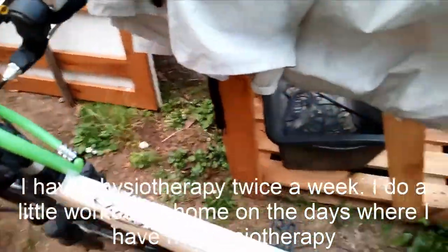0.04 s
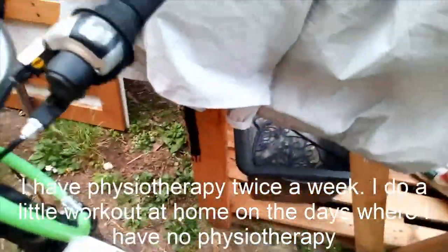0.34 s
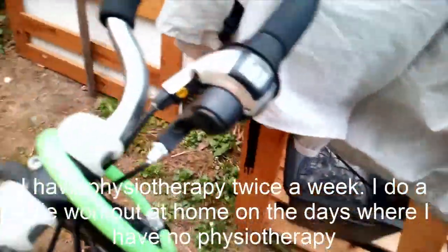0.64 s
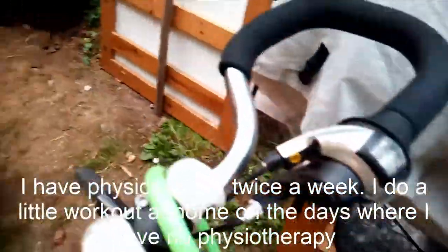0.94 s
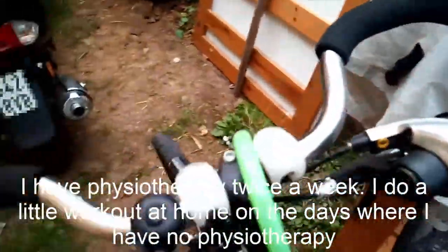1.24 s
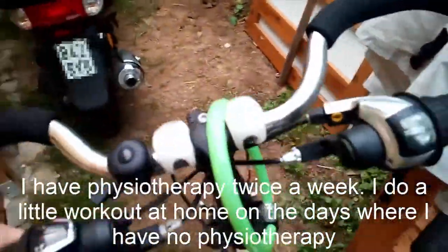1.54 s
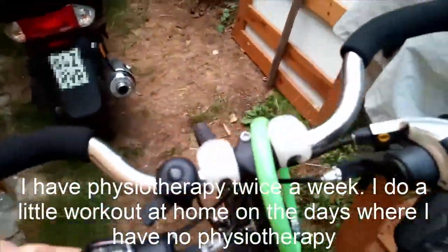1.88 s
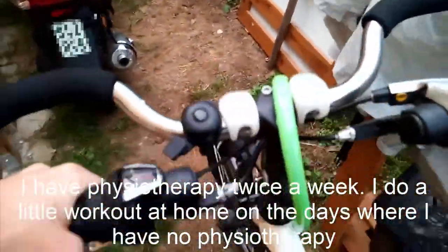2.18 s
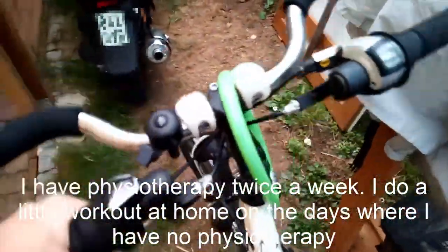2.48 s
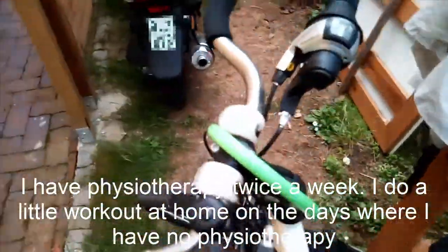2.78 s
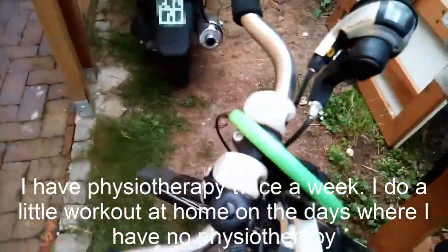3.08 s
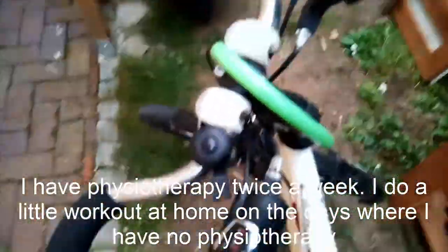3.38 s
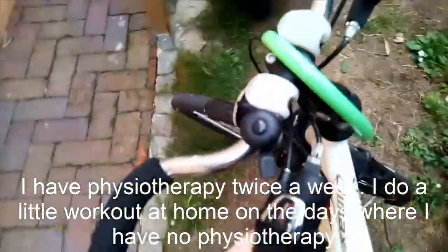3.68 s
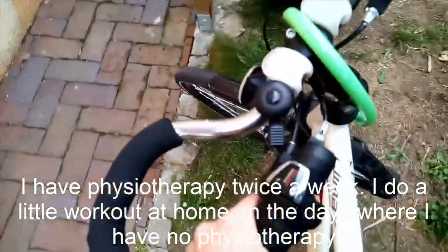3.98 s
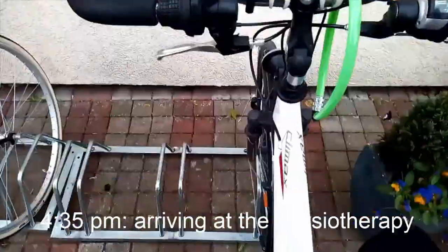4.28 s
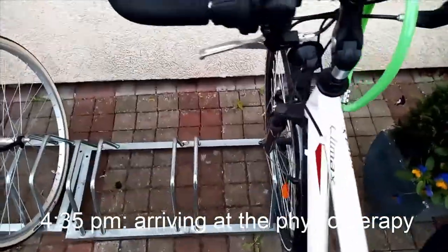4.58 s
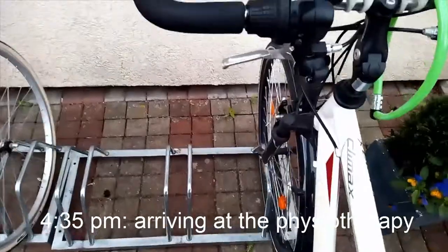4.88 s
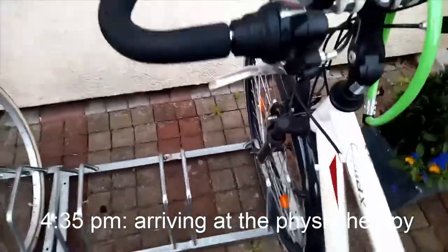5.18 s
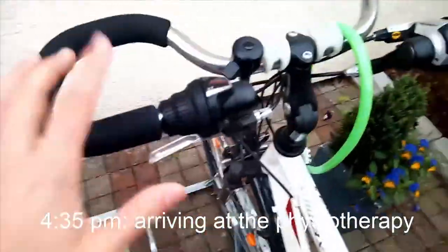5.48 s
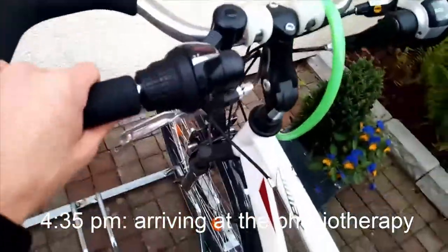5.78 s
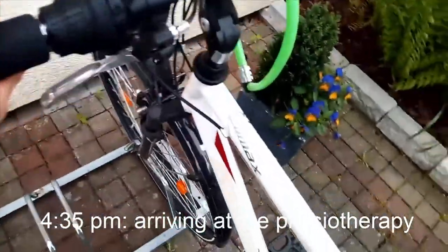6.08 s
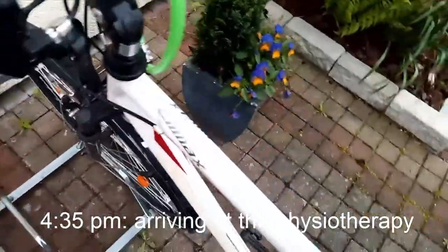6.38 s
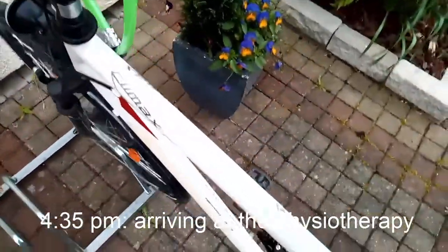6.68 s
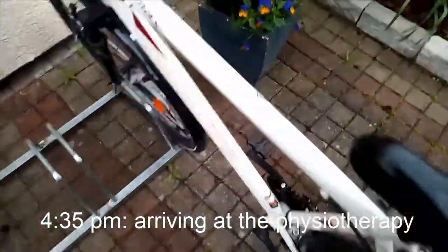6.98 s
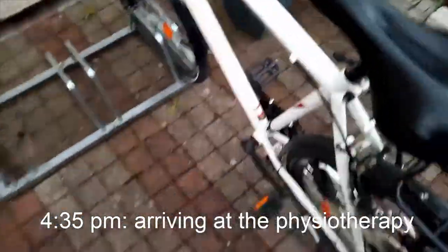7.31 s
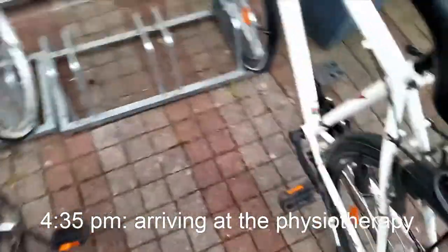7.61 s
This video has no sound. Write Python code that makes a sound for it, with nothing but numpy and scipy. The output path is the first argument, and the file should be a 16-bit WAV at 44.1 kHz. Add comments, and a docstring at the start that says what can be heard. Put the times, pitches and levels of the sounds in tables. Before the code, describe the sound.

A bicycle is wheeled by hand out of a yard, with soft nylon jacket rustle, scuffing soles and a distant motor hum. The freewheel ticks in short runs, then the handheld microphone's case knocks and creaks. After a brief dropout the bicycle is parked: levers clack, a sleeve swishes, the front wheel clashes against a metal rack and a brake squeals faintly. Loud close knocks and low bumps end it, leaving a faint steel ring.

```python
"""A nylon jacket rustles and soles scuff over a far motor's hum as a bicycle is wheeled out of a yard.
Freewheel pawls tick and ring the wheel, levers clack, and the microphone's case creaks and knocks in
the hand. After a short near-silence the bicycle is parked on paving: a sleeve zips over the jacket,
the front wheel jolts against the rack, a brake pad squeals on the rim and thin steel rings on."""
import sys
import numpy as np
from scipy import signal
from scipy.fft import rfft, irfft, next_fast_len
from scipy.io import wavfile
from scipy.ndimage import map_coordinates

SR = 44100
rng = np.random.default_rng(int(sys.argv[2]) if len(sys.argv) > 2 else 0)


def generate_wav(sig):
    """Save sig (samples, or channels by samples) to the path in sys.argv[1] as 16-bit PCM at SR."""
    pcm = np.round(np.clip(np.atleast_2d(sig).T, -1, 1) * 32767).astype(np.int16)
    wavfile.write(sys.argv[1], SR, pcm)


N = 341686
TIME = np.arange(N) / SR
YARD_END_S, RACK_START_S = 4.2, 4.25


def from_db(db):
    """Decibels to gain."""
    return 10 ** (np.asarray(db) / 20)


def unit_rms(x):
    """Scale to rms 1."""
    return x / np.sqrt(np.mean(x ** 2) + 1e-20)


def db_at(spectrum, hz):
    """Read a spectrum on a log-frequency axis."""
    points_hz, db = np.transpose(spectrum)
    return np.interp(np.log(hz + 1e-3), np.log(points_hz), db)


def noise(spectrum):
    """Coloured noise, rolled off beyond the table's ends; rms 1."""
    size = next_fast_len(N)
    hz = np.arange(size // 2 + 1) * SR / size
    skirts = np.minimum(hz / spectrum[0][0], 1) ** 2 / np.maximum(hz / spectrum[-1][0], 1) ** 2
    bins = rfft(rng.standard_normal(size)) * from_db(db_at(spectrum, hz)) * skirts
    return unit_rms(irfft(bins, size)[:N])


def drift(knots_per_s):
    """Random wander with a spread near 1."""
    knots = rng.standard_normal(N // 8)
    return np.interp(TIME * knots_per_s, np.arange(len(knots)), knots)


def add(track, start_s, sound):
    """Mix a sound into a track."""
    start = int(round(start_s * SR))
    track[start:start + len(sound)] += sound[:N - start]


def decay(t, t60_s):
    """Exponential decay from t = 0, down 60 dB at t60_s."""
    return (t >= 0) * from_db(-60 * np.maximum(t, 0) / t60_s)


def resonate(x, hz, width_hz):
    """One resonance, peak gain 1."""
    r = np.exp(-np.pi * width_hz / SR)
    feedback = [1, -2 * r * np.cos(2 * np.pi * hz / SR), r * r]
    return signal.lfilter(np.array([1, 0, -1]) * (1 - r * r) / 2, feedback, x + 1e-18)


def noise_band(samples, hz, width_hz):
    """Noise in one broad resonance; rms 1."""
    return unit_rms(resonate(resonate(rng.standard_normal(samples), hz, width_hz), hz, 2 * hz))


def metal_ring(x, modes):
    """Parallel modes of a metal part, alternating in sign."""
    return sum((-1) ** k * from_db(db) * resonate(x, hz, width_hz)
               for k, (hz, width_hz, db) in enumerate(modes))


# Reflections off ground and bicycle. Each row: delay in seconds, gain in dB.
ECHOES = [(.0025, -11.5), (.0063, -9)]
def echoed(x, sway=0.1796):
    """Short echoes whose delays sway as the hand moves; rms 1."""
    echoes = sum(from_db(db) * map_coordinates(x, [(TIME - delay_s * (1 + sway * drift(3))) * SR])
                 for delay_s, db in ECHOES)
    return unit_rms(x + echoes)


# Wheel and frame modes. Each row: frequency in Hz, width in Hz, gain in dB.
WHEEL_MODES = [(1530, 20, -5), (2455, 52, 2), (2705, 37, -6), (2917, 30, 1), (2993, 33, -3), (3100, 22, -6),
               (3394, 20, -3), (4850, 32, -2.5), (5160, 41, -15), (5550, 63, -11), (6240, 64, -0.5),
               (6700, 38, 3), (6900, 26, 2), (8050, 16, -7), (8470, 78, -6), (9060, 18, -10),
               (9500, 73, -5), (10400, 110, -1)]
def wheel_ring(x):
    """Spokes and frame ring when brushed or struck."""
    return metal_ring(x, WHEEL_MODES)


# Nylon friction spectrum. Each row: frequency in Hz, relative density in dB.
NYLON_SPECTRUM = [(700, -9), (1400, -5), (2500, 2), (3600, -1.5), (5000, -3), (6600, -1), (8000, -9),
                  (10000, -12), (12500, -22), (15200, -14), (16000, -57)]
# Rustle curve. Each row: time in seconds, level in dB.
RUSTLE = [(0, -53.5), (0.72, -49.5), (0.96, -53.5), (1.26, -52), (1.38, -50.5), (1.9, -61),
          (2.29, -57.5), (2.56, -49), (3.14, -60), (3.66, -55.5), (3.8, -59), (4.19, -52.5),
          (4.27, -53.5), (4.37, -51), (4.56, -48.5), (5.13, -44.5), (5.27, -50.5), (5.54, -46),
          (5.82, -53.5), (5.99, -38), (6.4, -43), (6.75, -41), (7.42, -52.5), (7.74, -49)]
def jacket_rustle(grain_db=2, swell_db=1, frame_db=-2):
    """Cloth rustles in fine grains and brushes the frame."""
    times_s, level_db = np.transpose(RUSTLE)
    cloth = noise(NYLON_SPECTRUM) * from_db(grain_db * drift(700) + swell_db * drift(18))
    frame = from_db(frame_db) * wheel_ring(noise(NYLON_SPECTRUM))
    return from_db(np.interp(TIME, times_s, level_db)) * echoed(cloth + frame)


# Ground contact spectra. Each row: frequency in Hz, relative density in dB.
SCUFF_SPECTRUM = [(120, -28), (300, -0.5), (480, 4.5), (1000, -0.5), (1600, -7), (3000, -11.5)]
RUMBLE_SPECTRUM = [(20, -9), (40, -12), (75, -1), (110, 3.5), (180, 0.5), (280, -4.5), (450, -10.5),
                   (900, -47)]
# Movement over the ground. Each row: time in seconds, relative scuff and rumble levels in dB.
GROUND = [(0, -58.5, -54), (1.73, -61.5, -52), (1.97, -71, -52), (2.3, -70, -55.5), (2.75, -61, -54.5),
          (3.33, -71.5, -53.5), (3.57, -56.5, -53), (4.03, -64.5, -49), (4.19, -59, -52),
          (4.27, -62, -59), (4.69, -53.5, -52.5), (4.94, -51, -52.5), (5.49, -57, -54.5),
          (5.89, -60, -54), (6.19, -50.5, -50), (6.73, -53, -56), (7.42, -56, -45), (7.74, -53.5, -50.5)]
def soles_and_tyres(grit_db=3, scuff_trim_db=1.5, early_db=-3, later_db=1, louder_from_s=3.3):
    """Soles and tyres scuff over a low rumble, softer for the first 3.3 s."""
    times_s, scuff_db, rumble_db = np.transpose(GROUND)
    grit = echoed(noise(SCUFF_SPECTRUM) * from_db(grit_db * drift(150)))
    scuff = from_db(np.interp(TIME, times_s, scuff_db) + scuff_trim_db) * grit
    step_db = np.where(TIME < louder_from_s, early_db, later_db)
    rumble = from_db(np.interp(TIME, times_s, rumble_db) + step_db) * noise(RUMBLE_SPECTRUM)
    return scuff + rumble


# Motor tones. Each row: frequency in Hz, rms level in dB.
MOTOR_TONES = [(87.5, -57.5), (110, -70), (163, -56.5), (174, -61.5), (264, -65), (328.4, -66)]
def motor_hum(wander=0.00623, waver_db=1):
    """A distant motor's wavering low tones, in the yard only."""
    out = np.zeros(N)
    for hz, db in MOTOR_TONES:
        amplitude = np.sqrt(2) * from_db(db + waver_db * drift(7.26))
        pitch_hz = hz * (1 + wander * drift(4.06))
        out += amplitude * np.sin(2 * np.pi * np.cumsum(pitch_hz) / SR)
    return out * (TIME < YARD_END_S)


# Hand on grip and sleeve. Each row: start in seconds, length in seconds, peak level in dB.
RUBS = [(0.086, 0.35, -50), (1.155, 0.046, -53), (2.484, 0.67, -53), (4.439, 0.15, -45.5)]
# Rub spectrum. Each row: frequency in Hz, relative density in dB.
RUB_SPECTRUM = [(1200, 0), (2300, 6.5), (4000, -3), (6500, 4.5), (9000, -7), (12500, -12), (15200, -8),
                (16000, -19)]
def hand_rubs(peak_share=0.19, grain_db=2):
    """Dry friction hiss swells quickly and ebbs as the hand slows."""
    pressure = np.zeros(N)
    for start_s, length_s, db in RUBS:
        pressure += from_db(db) * np.interp((TIME - start_s) / length_s, [0, peak_share, 1], [0, 1, 0])
    return pressure * echoed(noise(RUB_SPECTRUM) * from_db(grain_db * drift(700)))


# Tyre, sole and cable slides. Each row: start and length in seconds, relative level in dB, centre in Hz.
SLIDES = [(.322, 0.079, -54, 800), (.818, 0.056, -47.5, 990), (1.498, 0.028, -40.5, 1740),
          (3.373, 0.0092, -53, 1230), (4.898, 0.057, -38.5, 3300), (5.278, 0.049, -43, 3180),
          (5.573, 0.053, -46, 3070), (5.801, 0.15, -41.5, 4630), (6.019, 0.026, -41, 4250),
          (7.109, 0.12, -50.5, 5370), (7.151, 0.018, -39.5, 624)]
def slides(rise_s=0.0011, fade_s=0.12, grain_db=4.5, ring_db=7, direct_db=-3):
    """Friction sets in at once, holds, then dies; it excites the wheel's modes."""
    friction, t = np.zeros(N), TIME[:SR // 3]
    for start_s, length_s, db, hz in SLIDES:
        rise = 1 - np.exp(-t / rise_s)
        fall = decay(np.maximum(t - 0.98 * length_s, 0), fade_s + length_s)
        add(friction, start_s, from_db(db) * noise_band(len(t), hz, 1.1 * hz) * rise * fall)
    friction *= from_db(grain_db * drift(600))
    return from_db(direct_db) * friction + from_db(ring_db) * wheel_ring(friction)


# Spectrum of small ticks and case cracks. Each row: frequency in Hz, relative density in dB.
CRACK_SPECTRUM = [(500, 5), (1300, 2.5), (2400, -1), (3500, 0), (5000, -7), (6500, 0.5), (8500, -12),
                  (11500, -15), (15500, -15.5)]
def cable_and_grit_ticks(per_s=4, level_db=-48, spread_db=3, t60_s=0.0083):
    """Cables and grit tick faintly at random."""
    onsets = rng.random(N) < per_s / SR
    impulses = onsets * from_db(level_db + spread_db * rng.standard_normal(N))
    envelope = signal.lfilter([1], [1, -decay(1 / SR, t60_s)], impulses + 1e-18)
    return envelope * noise(CRACK_SPECTRUM)


# Case knocks. Each row: start in seconds, crack in dB, push in dB, push in Hz, thump in dB.
KNOCKS = [(0.6027, -27.5, -19, 456, -35), (3.460, -30, -32, 905, -32.5), (3.4672, -17, -13.5, 1700, -41),
          (3.5891, -18.5, -23.5, 1340, -47), (3.599, -28, -21, 1310, -25.5), (3.828, -18.5, -19, 1320, -24),
          (3.9608, -21, -22.5, 850, -31), (3.9736, -26, -24, 604, -23.5), (4.1164, -39, -16, 415, -23.5),
          (4.1332, -31.5, -31, 895, -35), (4.181, -37, -35, 493, -25), (4.9862, -38, -18, 620, -36),
          (5.067, -20.5, -22, 470, -22.5), (5.081, -40, -24, 1000, -23), (5.240, -29, -20.5, 900, -39),
          (5.2457, -20.5, -18, 960, -23.5), (7.0204, -27, -17, 1030, -56), (7.3498, -15.5, -20, 800, -23),
          (7.392, -18, -20, 447, -16.5), (7.4056, -24, -2, 1800, -38), (7.501, -36, -46, 900, -41),
          (7.622, -34.5, -25, 680, -26), (7.6634, -33.5, -26, 880, -33)]
def case_knocks(slips, crack_t60_s=0.0049, rattle_db=-21, rattle_t60_s=0.083,
                thump_hz=145, thump_t60_s=0.034, crack_lead_s=0.0003, thump_lag_s=0.00081):
    """Each slip under the fingers cracks, pushes the shell through about one swing and leaves a thump."""
    shell, cracks, t = np.zeros(N), np.zeros(N), TIME[:SR // 10]
    crack_envelope = decay(t, crack_t60_s) + from_db(rattle_db) * decay(t, rattle_t60_s)
    for start_s, crack_db, push_db, push_hz, thump_db in slips:
        cycles = push_hz * t
        swing = np.sin(2 * np.pi * cycles) * decay(t, 0.99 / push_hz) * (1 - np.exp(-5 * cycles))
        detune = from_db(rng.normal(0, 2.85))
        thump = np.sin(2 * np.pi * thump_hz * detune * t) * decay(t, thump_t60_s)
        add(cracks, start_s - crack_lead_s, from_db(crack_db) * crack_envelope)
        add(shell, start_s, from_db(push_db) * swing / swing.max())
        add(shell, start_s + thump_lag_s, -from_db(thump_db) * thump)
    highpass = signal.butter(2, 85, "high", fs=SR, output="sos")
    return signal.sosfilt(highpass, shell + cracks * noise(CRACK_SPECTRUM))


# Coasting spins. Each row: start and length in seconds, pawl drops, share of speed left, level in dB.
SPINS = [(1.3155, .0785, 8, 0.45, -17.5), (1.716, .1024, 6, .33, -18)]
def coasting_drops(full_speed_loss_db=7.5):
    """Friction slows each spin steadily; the pawls drop later and harder. Returns (s, dB) rows."""
    drops = []
    for start_s, length_s, teeth, speed_left, db in SPINS:
        speed = np.sqrt(1 - (1 - speed_left ** 2) * np.linspace(0, 1, teeth))
        progress = (1 - speed) / (1 - speed_left)
        drops += zip(start_s + length_s * progress, db - full_speed_loss_db * speed ** 3)
    return drops


# Lone pawl drops. Each row: start in seconds, relative level in dB.
LONE_DROPS = [(1.4203, -16), (1.4702, -16), (2.2934, -21.5), (2.427, -36.5), (5.088, -24.5), (5.122, -22),
              (5.167, -34.5)]
# Pawl spectrum. Each row: frequency in Hz, relative density in dB.
PAWL_SPECTRUM = [(180, -47), (300, -12.5), (1360, -13.5), (1480, -11), (1780, -8), (2980, -3),
                 (4090, -11.5), (4670, -3), (6850, -9.5), (7570, -8.5), (9090, -5), (11700, -17.5),
                 (15000, -17), (16000, -13)]
def freewheel(snap_t60_s=0.014, second_pawl_s=0.0012, rebound_s=0.0044, rebound_db=-8,
              tail_db=-9, tail_t60_s=0.132, ring_db=7, direct_db=-3):
    """Two pawls drop almost together and rebound; spokes and frame ring on."""
    power, t = np.zeros(N), TIME[:SR // 4]
    pawls = 0.28 * decay(t, snap_t60_s) + decay(t - second_pawl_s, snap_t60_s)
    rebound = from_db(rebound_db) * decay(t - rebound_s, snap_t60_s)
    tail = from_db(tail_db) * decay(t, tail_t60_s)
    for start_s, db in LONE_DROPS + coasting_drops():
        add(power, start_s, from_db(db) ** 2 * ((pawls + rebound) ** 2 + tail ** 2))
    ticks = np.sqrt(power) * noise(PAWL_SPECTRUM)
    return from_db(direct_db) * ticks + from_db(ring_db) * wheel_ring(ticks)


# Grip and lever clacks. Each row: start in seconds, level in dB, T60 in seconds, centre in Hz.
CLACKS = [(2.526, -27, 0.019, 3060), (3.276, -39, 0.0089, 6000), (4.091, -39, 0.018, 7640),
          (5.2235, -36, 0.0047, 7000), (5.5236, -20, 0.017, 4700), (5.532, -23, 0.022, 2900),
          (5.546, -26, 0.06, 4400), (5.673, -39, 0.026, 3460), (6.972, -35.5, 0.042, 3200),
          (7.006, -35.5, 0.044, 3180), (7.024, -36.5, .03, 2140), (7.3503, -13, 0.0047, 5700)]
def lever_clacks(width_share=0.38):
    """Plastic parts clack in one broad, well-damped resonance."""
    out, t = np.zeros(N), TIME[:SR // 8]
    for start_s, db, t60_s, hz in CLACKS:
        add(out, start_s, from_db(db) * noise_band(len(t), hz, hz * width_share) * decay(t, t60_s))
    return out


# Tyre and foot contacts. Each row: start in seconds, level in dB, frequency in Hz.
BUMPS = [(3.468, -26.5, 72), (3.829, -25, 94), (6.33, -37, 80), (7.374, -35, 112), (7.445, -19, 67),
         (7.459, -21, 89), (7.659, -26.5, 76.4)]
def ground_bumps(t60_s=0.074, rise_s=0.0049):
    """Soft contacts swell and die as a low boom."""
    out, t = np.zeros(N), TIME[:SR // 4]
    envelope = decay(t, t60_s) * (1 - np.exp(-t / rise_s))
    for start_s, db, hz in BUMPS:
        add(out, start_s, from_db(db) * np.sin(2 * np.pi * hz * t) * envelope)
    return out


def case_creak(start_s=3.624, count=9, slips_per_s=89, push_hz=1160, uneven_s=0.0007, uneven_db=0.5):
    """The case sticks and slips in a run of small knocks, heavier as the grip tightens."""
    slips = []
    for k, grip in enumerate(np.linspace(0, 1, count)):
        slip_s = start_s + k / slips_per_s + rng.normal(0, uneven_s)
        crack_db = rng.normal(-25, uneven_db)
        push_db = rng.normal(-30 + 2 * grip, uneven_db)
        thump_db = -44.5 + 21 * grip
        slips.append((slip_s, crack_db, push_db, push_hz, thump_db))
    return case_knocks(slips)


# Sleeve strokes. Each row: start and length in seconds, first and last thread rate in Hz, level in dB.
STROKES = [(5.761, .06, 1290, 2100, -38.5), (5.802, 0.045, 2500, 3050, -34.5),
           (5.838, 0.086, 1850, 2600, -39.5), (5.884, 0.063, 2570, 3670, -32.5),
           (5.904, 0.037, 3500, 5700, -41.5), (5.968, .15, 1950, 1800, -41.5),
           (6.014, 0.055, 2900, 3800, -32.5), (6.24, 0.092, 2650, 2200, -41),
           (6.344, 0.087, 3200, 1600, -43.5), (6.522, 0.23, 3660, 3500, -42.5),
           (6.69, 0.089, 3500, 4300, -37), (6.703, 0.11, 1530, 2300, -40),
           (7.177, 0.065, 4200, 4200, -46.5)]
def sleeve_zips(overtone_db=-3.5, rasp_db=-4, mid_speedup=0.046, jitter=0.035, flutter_db=4):
    """Ribbed nylon sings at the rate its threads cross; each crossing also releases a puff of hiss."""
    out, hiss = np.zeros(N), noise(NYLON_SPECTRUM)
    for start_s, length_s, first_hz, last_hz, db in STROKES:
        on = (TIME > start_s) & (TIME < start_s + length_s)
        progress = (TIME[on] - start_s) / length_s
        arch = np.abs(np.sin(np.pi * progress))
        pitch_hz = (first_hz + (last_hz - first_hz) * progress) * (1 + mid_speedup * arch)
        phase = 2 * np.pi * np.cumsum(pitch_hz * (1 + jitter * drift(1500)[on])) / SR
        tone = 0
        for k in range(1, 5):
            harmonic_db = db_at(NYLON_SPECTRUM, k * pitch_hz) + overtone_db * (k - 1)
            tone += from_db(harmonic_db + flutter_db * drift(300)[on]) * np.sin(k * phase)
        rasp = from_db(rasp_db) * hiss[on] * (1 + np.cos(phase)) / 2
        out[on] += from_db(db) * arch ** 0.39 * (tone + rasp)
    return out


# Wheel impacts on the rack. Each row: start in seconds, relative level in dB, T60 in seconds.
JOLTS = [(6.135, -17.5, 0.065), (6.142, -20, 0.045), (6.151, -27, 0.38)]
# Impact spectrum. Each row: frequency in Hz, relative density in dB.
JOLT_SPECTRUM = [(350, -59), (600, -31), (1440, -11), (1650, -18), (1940, -1.5), (2310, -5.5), (2600, -9),
                 (3100, -7), (4060, -11.5), (15000, -42)]
# Modes of the wheel against the rack. Each row: frequency in Hz, width in Hz, gain in dB.
RACK_MODES = [(1490, 110, -19), (2170, 36, 1), (2420, 30, -18), (2655, 26, 8), (2810, 24, -11),
              (3160, 25, -4), (3815, 14, 2), (3890, 34, -8), (5350, 140, -12), (6060, 67, -14)]
def rack_jolt(ring_db=5, direct_db=-2):
    """The front wheel slips in the rack with a short, ringing clash."""
    envelope = np.zeros(N)
    for start_s, db, t60_s in JOLTS:
        add(envelope, start_s, from_db(db) * decay(TIME[:SR // 3], t60_s))
    clash = envelope * noise(JOLT_SPECTRUM)
    return from_db(direct_db) * clash + from_db(ring_db) * metal_ring(clash, RACK_MODES)


# Brake squeals. Each row: start in seconds, length in seconds, level in dB.
SQUEALS = [(6.588, .13, -38), (6.762, 0.21, -40)]
def brake_squeal(settled_hz=2440, flat_hz=295, settle_s=0.03, jitter=0.018, flutter_db=3):
    """A pad brushes the rim; its thin tone starts flat and slides up to pitch."""
    out = np.zeros(N)
    for start_s, length_s, db in SQUEALS:
        on = (TIME > start_s) & (TIME < start_s + length_s)
        t = TIME[on] - start_s
        pitch_hz = (settled_hz - flat_hz * np.exp(-t / settle_s)) * (1 + jitter * drift(1500)[on])
        tone = np.sin(2 * np.pi * np.cumsum(pitch_hz) / SR)
        swell = np.sqrt(np.abs(np.sin(np.pi * t / length_s)))
        out[on] += from_db(db + flutter_db * drift(220)[on]) * swell * tone
    return out


# Steel partials. Each row: frequency in Hz, level in dB, T60 in seconds.
STEEL_PARTIALS = [(1570, -46, 0.43), (1820, -57, .6), (2439, -69, 0.77)]
def steel_ring(start_s=7.445, rise_s=0.02):
    """Thin steel rings on faintly after the bicycle is let go."""
    t = np.maximum(TIME - start_s, 0)
    ring = sum(from_db(db) * np.sin(2 * np.pi * hz * t) * decay(t, t60_s)
               for hz, db, t60_s in STEEL_PARTIALS)
    return (1 - np.exp(-t / rise_s)) * ring


def scene():
    """Mono mix in the open air, without reverberation."""
    background = jacket_rustle() + soles_and_tyres() + motor_hum()
    handling = hand_rubs() + slides() + cable_and_grit_ticks() + case_knocks(KNOCKS)
    wheeling = freewheel() + lever_clacks() + ground_bumps() + case_creak()
    parking = sleeve_zips() + rack_jolt() + brake_squeal() + steel_ring()
    return (background + handling + wheeling + parking)[None]


def record(dry, limit_db=-11, attack_s=0.0043, release_db_per_s=110,
           gap_gain=0.02, fade_in_s=0.071, cutoff_hz=16500):
    """Gain drops after loud peaks and recovers; the gap between places is ducked; the top is cut."""
    over_db = np.maximum(20 * np.log10(np.abs(dry[0]) + 1e-9) - limit_db, 0)
    release_db = release_db_per_s * TIME
    held_db = np.maximum.accumulate(over_db + release_db) - release_db
    pole = np.exp(-1 / (attack_s * SR))
    limiter_gain = from_db(-signal.lfilter([1 - pole], [1, -pole], held_db))
    gate = (TIME < YARD_END_S) + np.clip((TIME - RACK_START_S) / fade_in_s, 0, 1)
    lowpass = signal.cheby2(14, 60, cutoff_hz, fs=SR, output="sos")
    return signal.sosfilt(lowpass, dry * limiter_gain * np.maximum(gate, gap_gain))


dry = scene()
out = record(dry)
generate_wav(out)
```